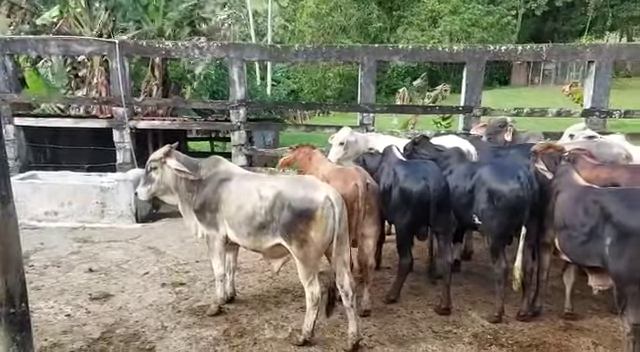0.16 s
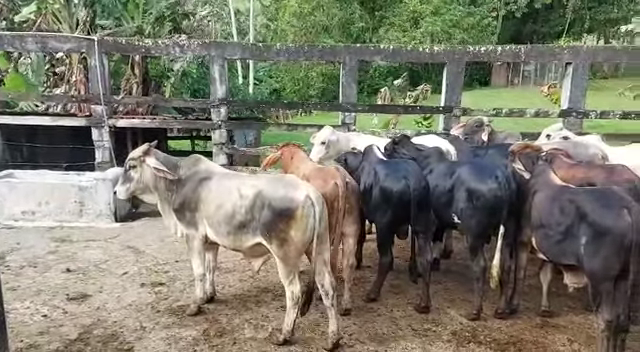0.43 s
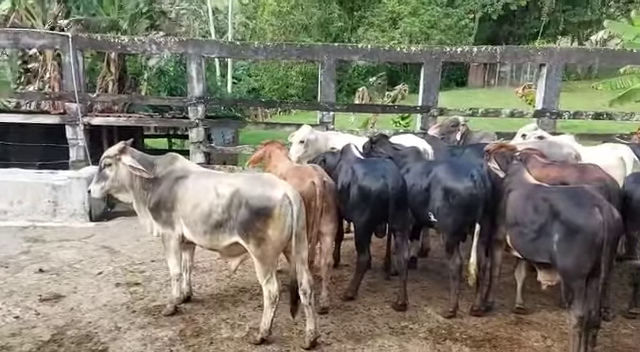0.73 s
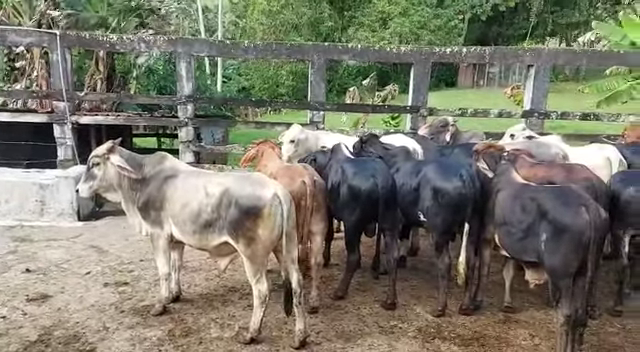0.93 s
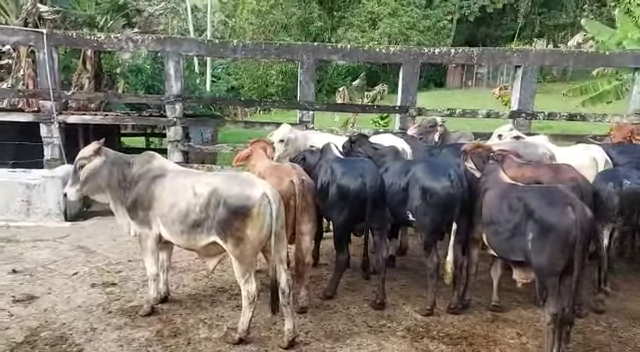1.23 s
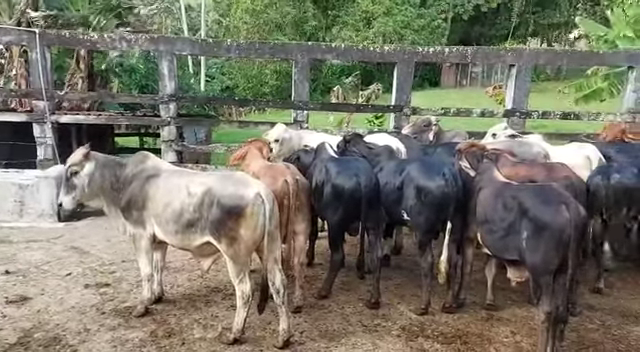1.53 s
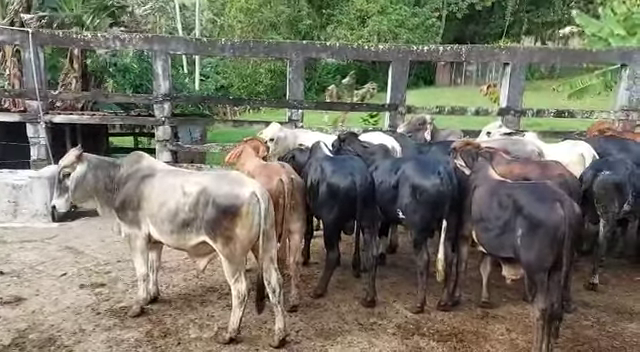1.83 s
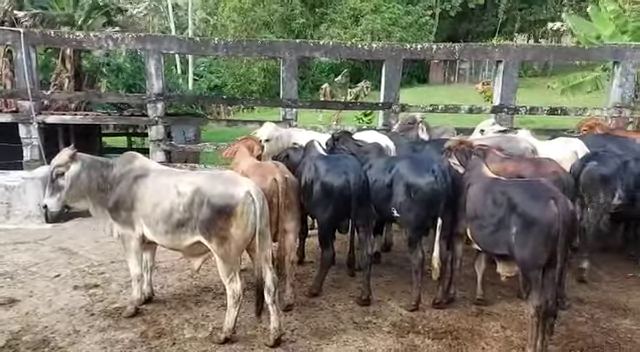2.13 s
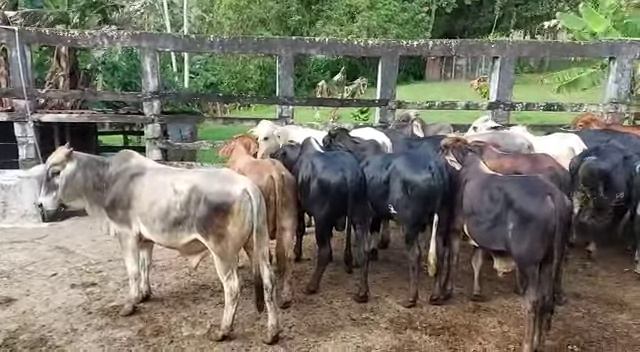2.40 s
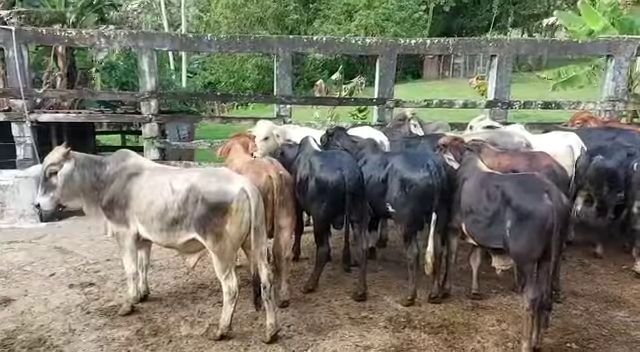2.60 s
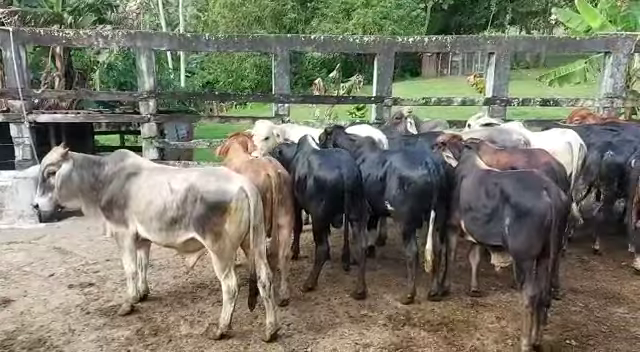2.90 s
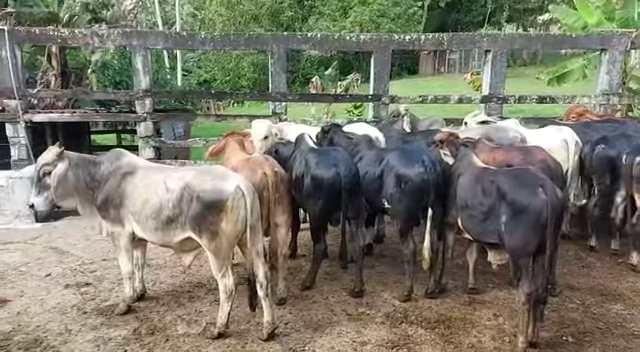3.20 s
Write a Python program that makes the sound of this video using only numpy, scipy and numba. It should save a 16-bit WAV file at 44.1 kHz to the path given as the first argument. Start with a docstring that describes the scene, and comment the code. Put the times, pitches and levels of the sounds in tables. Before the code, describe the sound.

Close by in an open-air cattle pen, a cow bellows once, raspy and falling in pitch at the end. A quiet inhale follows, then the herd shifts its hooves on gritty ground, with very faint distant birds.

```python
"""A cow bellows in a corral

A cow bellows hoarsely: uneven pulses from her vocal folds and puffs of breath ring her throat,
mouth and nose. Her voice sinks into a growl, then she draws a rough breath. The herd's hooves tick,
scuff and thud on packed dirt, over far birds, outdoor hiss and a light rumble."""
import sys
import numpy as np
from scipy import signal
from scipy.fft import rfft, irfft
from scipy.io import wavfile
from scipy.ndimage import uniform_filter1d
from numba import njit

SR = 44100
rng = np.random.default_rng(int(sys.argv[2]) if len(sys.argv) > 2 else 0)


def master(y):
    """Save y as 16-bit WAV."""
    cut = np.clip(np.atleast_2d(y).T, -1, 1)
    pcm = np.round(cut * 32767)  # scale
    wavfile.write(sys.argv[1], SR, pcm.astype(np.int16))


N = 147735
TIME_S = np.arange(N) / SR

# The course of the bellow. Opening the mouth shifts its resonances; pulses alternate strong and weak.
# time_s, pitch_hz, roughness (0-1), mouth_opening (ratio), hum_db, strong_weak_db
BELLOW = [(0, 171.2, 0.99, -0.021, -50, 0), (.12, 154.7, 0.8, -0.021, -57, 1),
          (.19, 160, 0.6, -0.012, -50, 3), (.235, 164.5, 0.28, -0.0063, -47, 3),
          (.3, 167.5, 0.26, -0.008, -46, 3), (.355, 169.5, 0.3, -0.0098, -44.5, 3),
          (.39, 171.5, 0.7, -0.0064, -45, 1), (.8, 169.4, .75, -0.00085, -42.5, 0),
          (.9, 165.8, .85, 0.011, -46, 0), (1.0, 144.8, .75, .04, -52, 0), (1.1, 115, .62, 0.051, -70, 0),
          (1.2, 65, .55, .05, -79, 0), (1.3, 41.8, .55, 0.069, -76, 0)]
# How strong each part of the voice is.
# time_s, throat_db, lower_mouth_db, mouth_db, upper_mouth_db, hiss_db, nose_db
VOICE_LEVELS = [(0.0, -39.5, -45, -42, -32.5, -44, -30), (0.04, -31, -35, -33, -29, -52.5, -38),
                (0.09, -36, -33.5, -38.5, -35, -53.5, -46), (0.154, -34, -35, -29.5, -29.5, -54, -34),
                (0.32, -54.5, -36, -27.5, -28, -50.5, -31.5), (0.412, -33, -32.5, -27, -26.5, -51, -32.5),
                (0.534, -44, -35, -28, -31, -59.5, -28.5), (0.576, -30.5, -30, -29.5, -26.5, -51.5, -27.5),
                (0.63, -31.5, -35.5, -27, -31, -52.5, -31), (0.68, -33, -29, -26.5, -27.5, -50, -28.5),
                (0.706, -29, -27, -30.5, -34.5, -49.5, -36), (0.722, -28.5, -48, -23.5, -22.5, -51.5, -27),
                (0.78, -27, -29, -28, -28, -49.5, -29.5), (0.888, -27, -31, -28, -27, -48.5, -29),
                (1.048, -17.5, -28, -26.5, -25, -45, -30.5), (1.174, -30, -30.5, -31, -35.5, -56, -35),
                (1.224, -42.5, -40, -45.5, -47, -64.5, -52), (1.256, -31, -49, -54, -41.5, -80, -59),
                (1.286, -49, -49, -56.5, -58.5, -78, -69), (1.5, -53.5, -70.5, -67.5, -67.5, -66, -77)]
# A steady boost for each of those six parts: gain_db
VOICE_GAINS = [0.81, 3.3, 5.8, 1.6, 1.2, -0.5]

def bellow():
    """The vocal folds ring the airway, joined by a low hum and two clear tones."""
    pitch_hz, roughness, opening, hum_db, strong_weak_db = in_time(BELLOW)
    buzz, puffs = vocal_folds(pitch_hz, roughness, strong_weak_db)
    fade = np.clip((VOICE_LEVELS[-1][0] - TIME_S) / .061, 0, 1)
    levels = fade * amp(np.array(in_time(VOICE_LEVELS)) + np.array(VOICE_GAINS)[:, None])
    throat, *mouth_parts, hiss, nose = levels * airway(buzz, puffs, opening)
    hum = amp(hum_db + 5) * sine(pitch_hz)
    tone, dip = throat_tone()
    return throat * dip + fade * (hum + tone), sum(mouth_parts) + mouth_tone(), hiss, nose


def vocal_folds(pitch_hz, roughness, strong_weak_db):
    """Each cycle gives a pulse and a puff of air. A rougher voice is more uneven and breathy."""
    wobble = .15 * roughness ** 2 * drift(60)
    cycles = np.cumsum(pitch_hz * (1 + wobble)) / SR
    count = np.floor(cycles)
    pulses = np.diff(count, prepend=0) * amp(2 * roughness * drift(95) + strong_weak_db * (-1) ** count)
    pulses = signal.lfilter(*signal.butter(2, 2500, fs=SR), rms_one(pulses))
    puffs = rng.standard_normal(N) * (.75 + np.exp(-3 * (cycles % 1))) * amp(2.28 * drift(40))
    buzz = (1 - .74 * roughness) * pulses + 1.91 * roughness ** 2 * rms_one(puffs)
    return buzz, puffs


# The resonances of the airway: pitches at which the air inside likes to ring.
# centre_hz, base_width_hz, level_db, opening_share (ratio), part (0 = throat ... 5 = nose)
RESONANCES = [(265.7, 35.4, 2, 0, 0), (321, 260, -5, 0, 0), (212, 45, -8.5, -3.0, 0),
              (525.7, 28, -1, 0.9, 1), (598, 110, -13, 1, 1), (438, 110, -11.5, 0, 1),
              (904.6, 32, -5, 0.57, 2), (955, 200, -8, 0, 2), (1417, 220, -11, .5, 4), (1729, 188, 0, 1, 3),
              (2245, 108, -14, .9, 3), (2570, 105, -28, .5, 3), (3520, 420, -3, 1.2, 4),
              (4100, 300, -14, 0, 4), (5000, 330, -11, 1.2, 4), (6350, 510, -17, 0, 4),
              (7850, 330, -9, -1.0, 4), (12100, 10000, -11, 0.23, 4), (1068, 75, -0.5, -.3, 5),
              (2103, 390, -15.5, 0, 5), (697, 124, -11, 0, 5), (3340, 110, -33, .5, 2)]
# The airway settles as the call begins: time_s, throat_shift (ratio), lower_mouth_shift (ratio)
SETTLING = [(0, .27, .03), (.03, .24, -.08), (.06, -.1, -.14), (.1, .02, -.04), (.15, .09, .03),
            (.22, .08, -.02), (.3, 0, 0)]

def airway(buzz, puffs, opening):
    """Moving resonances shape buzz and puffs into six equally strong parts of the voice."""
    settling = in_time(SETTLING) + [0] * 4
    late_rasp_db = -9 * np.clip(1 - (TIME_S - .3) / .3, 0, 1)
    parts = np.zeros((6, N))
    for k, (hz, width_hz, db, share, part) in enumerate(RESONANCES):
        centre_hz = hz * (1 + share * opening + settling[part])
        source = puffs if part == 4 else buzz  # the hiss is breath alone
        ring = resonate(source, centre_hz, 1.39 * width_hz)
        ring = resonate(ring, centre_hz, 1.48 * width_hz)
        parts[part] += (-1) ** k * amp(db + late_rasp_db * (4500 < hz < 9000)) * rms_one(ring)
    return parts / np.sqrt(uniform_filter1d(parts ** 2, size=4000, axis=1) + 1e-9)


# A clear tone in the throat: time_s, pitch_hz, level_db
THROAT_TONE = [(.36, 258.8, -43), (.43, 261.9, -34), (.53, 265.5, -41.5), (.6, 271.7, -32.5),
               (.68, 267, -39), (.76, 277.7, -31.5), (.84, 300.6, -27.5), (0.899, 298.5, -31),
               (.94, 279.6, -24.5), (.99, 264.7, -19), (1.06, 264, -16), (1.1, 264, -30.5)]

def throat_tone():
    """A tone grows with the bellow. Also gives the dip it makes in the rest of the throat's sound."""
    hz, db = in_time(THROAT_TONE)
    swell = fade_ends(THROAT_TONE, fade_s=.044)
    tone = swell * amp(db + 3 + 1.205 * drift(25)) * sine(hz + 3 * drift(30))
    dip = 1 - swell * np.clip((db + 44.5) / 30, 0, .8)
    return tone, dip


# A clear tone in the mouth: time_s, pitch_hz, level_db
MOUTH_TONE = [(0.36, 914.8, -33), (0.388, 906.4, -22), (0.448, 898.2, -23), (0.466, 898.8, -38),
              (0.476, 907.4, -23), (0.55, 899.8, -22), (0.594, 895.1, -36), (0.606, 901.3, -24),
              (0.76, 919.5, -31), (0.804, 906.0, -22), (0.818, 903.2, -36), (0.84, 899.7, -30)]

def mouth_tone():
    """A higher, wavering tone rings at the height of the call."""
    hz, db = in_time(MOUTH_TONE)
    return fade_ends(MOUTH_TONE, fade_s=.025) * amp(db + 9.5) * sine(hz + 5 * drift(30))


# The breath drawn in: time_s, level_db
BREATH_LEVELS = [(1.598, -59), (1.65, -56.5), (1.72, -54), (1.77, -48.5), (1.82, -52), (1.86, -59),
                 (1.9, -74)]
# The resonances of the open airway: centre_hz, base_width_hz, level_db
BREATH_RESONANCES = [(301, 250, -15), (980, 80, 3), (1085.6, 100, -2), (1860, 640, -12.5)]

def breath_in():
    """An uneven rush of air rings the open airway."""
    swell = amp(in_time(BREATH_LEVELS)[0] + 8) * fade_ends(BREATH_LEVELS, fade_s=.03)
    air = rng.standard_normal(N) * amp(3.4 * drift(74))
    breath = np.zeros(N)
    for hz, width_hz, db in BREATH_RESONANCES:
        centre_hz = np.full(N, float(hz))
        ring = resonate(air, centre_hz, 1.8 * width_hz)
        breath += amp(db) * rms_one(resonate(ring, centre_hz, 1.8 * width_hz))
    return swell * rms_one(band(breath, 211, 1800))


# Hooves striking grit: start_s, knock_db, crack_db, pitch_hz, pan_db
HOOF_TICKS = [(2.175, -44, -47.5, 1190, -5.5), (2.5258, -36.5, -42, 930, -8), (2.538, -44, -45, 1500, -3),
              (2.6, -44.5, -58, 500, 0), (2.8236, -44, -41, 900, -4), (2.848, -46, -46, 900, 2),
              (2.8625, -44.5, -62, 496, -4.5), (2.871, -58, -46, 900, 1), (2.9233, -43, -46, 1310, 0),
              (2.931, -58, -44, 900, -2), (2.9445, -39, -45, 1000, 2), (2.9725, -54, -46, 890, -6),
              (3.0385, -59, -48, 900, -3), (3.052, -44, -51, 1200, -1), (3.054, -49, -52, 900, -1),
              (3.067, -56, -46, 895, 0), (3.122, -58, -44, 900, 0), (3.136, -52, -44, 900, 0),
              (3.162, -53, -50, 1500, 0), (3.168, -47, -44, 890, -2), (3.183, -57, -46, 890, -5)]

def hoof_ticks():
    """Each strike is a knock that dies within three cycles, plus a sharp crack."""
    out, age_s = np.zeros((2, N)), np.arange(600) / SR
    for start_s, knock_db, crack_db, hz, pan_db in HOOF_TICKS:
        grit = rng.standard_normal(601)
        knock = amp(knock_db + 5.5 - 60 * age_s * hz / 2.9) * np.sin(2 * np.pi * hz * age_s)
        crack = amp(crack_db) * (grit[1:] - .1 * grit[:-1]) * np.exp(-age_s / .00037)
        start = int(start_s * SR)
        out[:, start:start + 600] += (knock + crack) * amp([[pan_db / 2], [-pan_db / 2]])
    return out


# Hooves dragging over dirt: start_s, length_s, level_db, pan_db
HOOF_SCUFFS = [(2.155, 0.067, -53, -0.5), (2.218, 0.13, -64, 1.5), (2.513, 0.098, -48, -4),
               (2.802, 0.095, -57.5, 2), (2.902, 0.066, -58, 0), (3.03, 0.043, -61, 1),
               (3.139, 0.058, -55.5, -1)]
# The tone colour of scraped dirt: frequency_hz, level_db
DIRT_COLOUR = [(150, -20.5), (400, -5), (700, -3.5), (1200, -4.5), (2100, -4), (3200, -15), (6000, -20),
               (15500, -27)]

def hoof_scuffs():
    """Gritty noise swells and fades as a hoof scrapes the ground."""
    noise = rng.standard_normal((2, N)) + .29 * rng.standard_normal(N)
    grit = rms_one(coloured(noise, DIRT_COLOUR)) * amp(2 * drift(150))
    out = np.zeros((2, N))
    for start_s, length_s, db, pan_db in HOOF_SCUFFS:
        progress = np.clip((TIME_S - start_s) / length_s, 0, 1)
        out += grit * placed(amp(db) * np.sin(np.pi * progress), pan_db)
    return out


# Hooves landing on packed dirt: start_s, level_db, pitch_hz
HOOF_THUDS = [(.14, -34.5, 81), (2.135, -56.5, 88.5), (2.171, -49, 109), (2.199, -46.5, 79.4),
              (2.27, -51, 79.4), (2.601, -50.5, 116), (3.118, -34.5, 85), (3.135, -36, 81),
              (3.165, -34.5, 78)]

def hoof_thuds(die_away_s=.13):
    """Each footfall is a low tone that dies fast, a little out of step between the ears."""
    out = np.zeros((2, N))
    for start_s, db, hz in HOOF_THUDS:
        age_s = np.maximum(TIME_S - start_s, 0)
        level = amp(db - 60 * age_s / die_away_s) * (1 - np.exp(-age_s / .0035))
        ear_phase = [[0], [rng.uniform(-1.1, 1.8)]]
        out += level * np.sin(2 * np.pi * hz * age_s + ear_phase)
    return out * [[-1.3], [-.9]]  # louder on the left


def body_echoes(sound, decay_s=.025):
    """Nearby bodies throw the cow's hiss back, differently to each ear."""
    bounces = rng.standard_normal((2, 5000)) * np.exp(-TIME_S[:5000] / decay_s)
    bounces /= np.linalg.norm(bounces, axis=1, keepdims=True)
    return amp(-1) * signal.fftconvolve(sound[None], bounces, axes=1)[:, :N]


def yard_echoes(sound, die_away_s=.2):
    """Fences and trees scatter dull echoes, different ones to each ear."""
    age_s = TIME_S[:SR]
    echoes = rng.standard_normal((2, SR)) * amp(-60 * age_s / die_away_s) * np.clip(age_s / .0071, 0, 1)
    echoes = rms_one(band(echoes, 341, 3170)) / np.sqrt(SR)
    return amp(-13.5) * signal.fftconvolve(sound[None], echoes, axes=1)[:, :N]


# Far bird chirps: start_s, length_s, start_hz, end_hz, level_db
CHIRPS = [(1.37, .06, 4500, 4330, -71), (2.135, .09, 4650, 4610, -68), (2.26, .035, 4650, 4630, -74)]

def birds():
    """Faint whistles waver and slide slightly down."""
    out = np.zeros(N)
    for start_s, length_s, start_hz, end_hz, db in CHIRPS:
        progress = np.clip((TIME_S - start_s) / length_s, 0, 1)
        hz = start_hz + (end_hz - start_hz) * progress + 25 * drift(60)
        out += amp(db + 3) * np.sin(np.pi * progress) * sine(hz)
    return placed(out, pan_db=0)


# The tone colour of the outdoor hiss: frequency_hz, level_db
HISS_COLOUR = [(100, -13.5), (250, 2), (500, -3), (1000, -9.5), (2200, -5.5), (3500, -7.5), (5500, -9.5),
               (6900, -8), (8500, -12.5), (11500, -13), (15800, -17.5)]
# How strong its low and high parts are: time_s, low_db, high_db
HISS_LEVELS = [(1.3, -52, -60.5), (1.44, -66.5, -66.5), (1.7, -69.5, -65), (1.89, -74.5, -67.5),
               (2.14, -74, -67), (2.32, -67.5, -66), (2.91, -69.5, -64), (3.01, -65.5, -63.5),
               (3.35, -71, -65)]

def outdoor_hiss():
    """Far hiss has a wavering low part and a steadier high part."""
    air = coloured(rng.standard_normal((2, 2, N)), HISS_COLOUR)
    low_db, high_db = in_time(HISS_LEVELS)
    low = amp(low_db + 7.5 + 3.1 * drift(5.5)) * rms_one(band(air[0], 110, 1130))
    high = amp(high_db + 6.5 + .39 * drift(16)) * rms_one(band(air[1], 710, 22000))
    return low + high


# The rise and fall of the low rumble: time_s, level_db
RUMBLE_LEVELS = [(0.0, -41.5), (0.12, -66), (0.15, -42), (0.58, -54), (0.78, -52), (1.18, -46), (1.33, -60),
                 (2.04, -86), (2.21, -49.5), (2.34, -77), (2.57, -77), (2.6, -59), (2.75, -75),
                 (3.15, -51.5), (3.35, -68.5)]

def rumble():
    """Deep, lumpy noise is partly shared by both ears."""
    separate = band(rng.standard_normal((2, N)), 43, 129)
    shared = band(rng.standard_normal(N), 43, 129)
    noise = rms_one(separate + .9 * np.array([shared, np.roll(shared, 170)]))
    ear_db = [2.5 + 2 * drift(6.8), .5 + 2 * drift(12)]
    return amp(in_time(RUMBLE_LEVELS)[0] + ear_db) * noise


def amp(db):
    """Turn decibels into a gain."""
    return 10 ** (np.asarray(db) / 20)


def rms_one(x):
    """Scale a sound to an average power of 1."""
    return x / np.sqrt(np.mean(x ** 2) + 1e-20)


def sine(hz):
    """A pure tone that follows a changing pitch."""
    return np.sin(2 * np.pi * np.cumsum(hz) / SR)


def in_time(rows):
    """Join a table's rows into one curve for each column after time_s."""
    time_s, *columns = np.transpose(rows)
    return [np.interp(TIME_S, time_s, column) for column in columns]


def fade_ends(rows, fade_s):
    """Fade in from a table's first time and out to its last."""
    return np.clip(np.minimum(TIME_S - rows[0][0], rows[-1][0] - TIME_S) / fade_s, 0, 1)


def band(x, low_hz, high_hz):
    """Keep what lies between two frequencies."""
    return signal.sosfilt(signal.butter(2, [low_hz, high_hz], "band", fs=SR, output="sos"), x)


def coloured(noise, colour):
    """Give noise a tone colour."""
    hz, db = np.transpose(colour)
    all_hz = np.maximum(np.arange(N // 2 + 1) * SR / N, 1)
    return irfft(rfft(noise) * amp(np.interp(np.log(all_hz), np.log(hz), db)), N)


def drift(rate_hz):
    """A smooth random wander, about 1 in size."""
    r = np.exp(-2 * np.pi * rate_hz / SR)
    return rms_one(signal.lfilter([1], [1, -2 * r, r * r], rng.standard_normal(N + SR))[SR:])


@njit
def resonate(x, hz, width_hz):
    """Make a sound ring around a pitch that can move."""
    y, r = np.zeros(len(x)), np.exp(-np.pi * width_hz / SR)
    for i in range(2, len(x)):
        y[i] = x[i] - x[i - 2] + 2 * r * np.cos(2 * np.pi * hz[i] / SR) * y[i - 1] - r * r * y[i - 2]
    return y


def placed(x, pan_db, lag_s=0):
    """Make stereo: the left ear is pan_db louder and lag_s later."""
    left = np.interp(TIME_S - lag_s, TIME_S, x, left=0)
    return np.array([left * amp(pan_db / 2), x * amp(-pan_db / 2)])


def scene():
    """Mix the cow, her echoes, the herd's hooves and the background."""
    throat, mouth, hiss, nose = bellow()
    cow = placed(throat, pan_db=1, lag_s=.00044) + placed(nose, pan_db=-4)
    cow += placed(mouth + .6 * hiss + breath_in(), pan_db=3.5, lag_s=.00044)
    echoes = body_echoes(hiss) + yard_echoes(throat + mouth + nose)
    hooves = hoof_ticks() + hoof_scuffs() + hoof_thuds()
    return cow + echoes + hooves + birds() + outdoor_hiss() + rumble()


def record(dry):
    """Cut the very highest treble."""
    return signal.sosfilt(signal.ellip(10, .5, 70, 15750, fs=SR, output="sos"), dry)


dry = scene()
out = record(dry)
master(out)
```